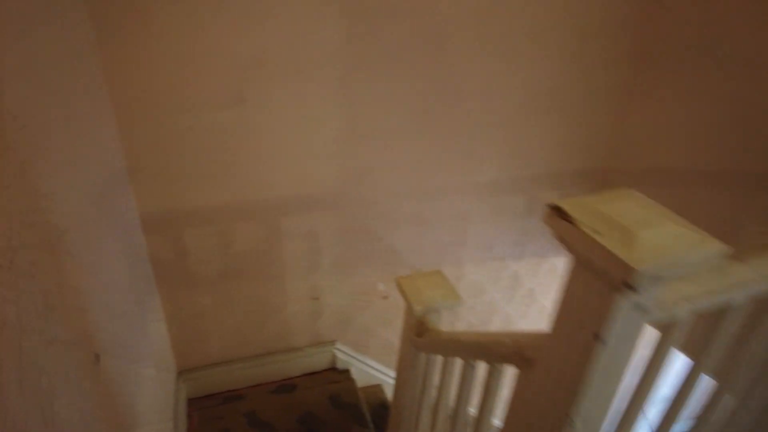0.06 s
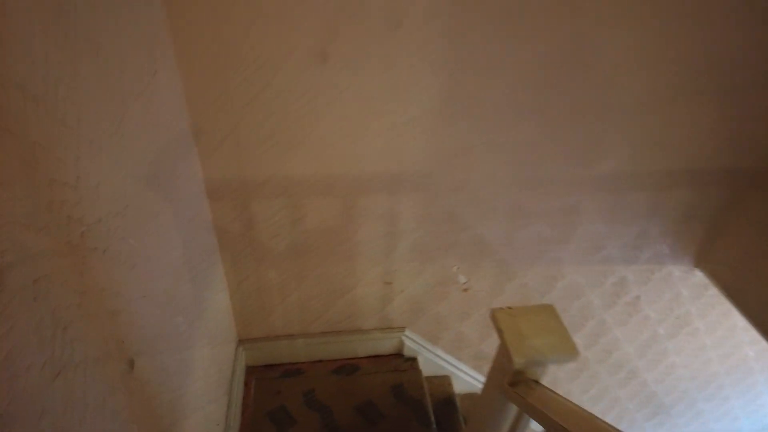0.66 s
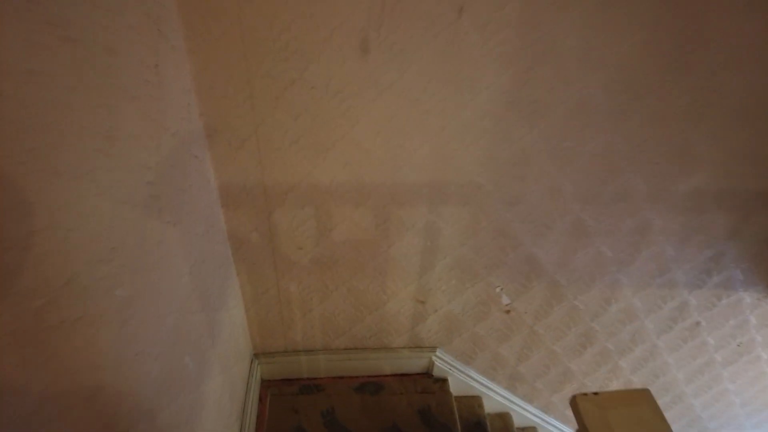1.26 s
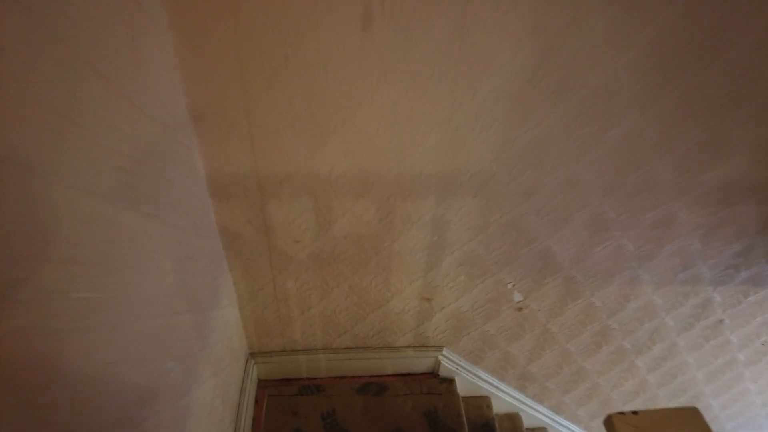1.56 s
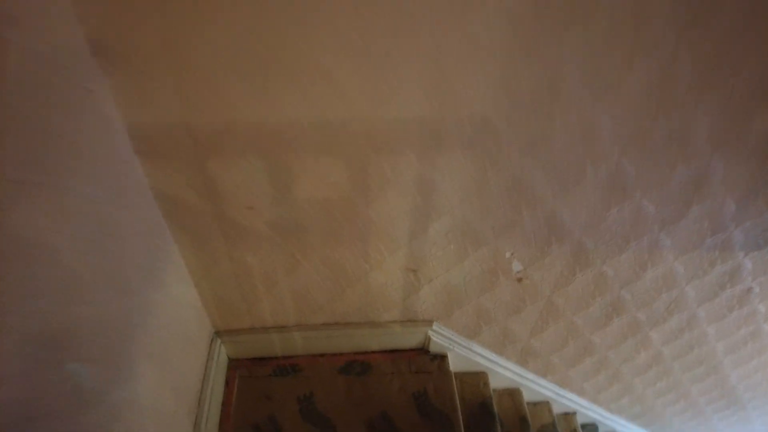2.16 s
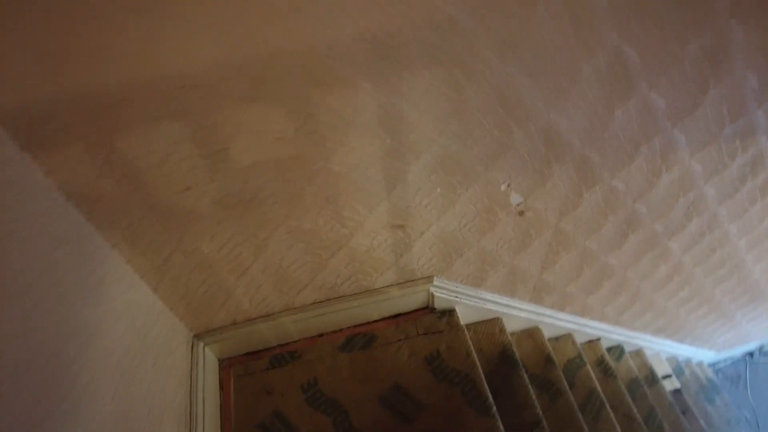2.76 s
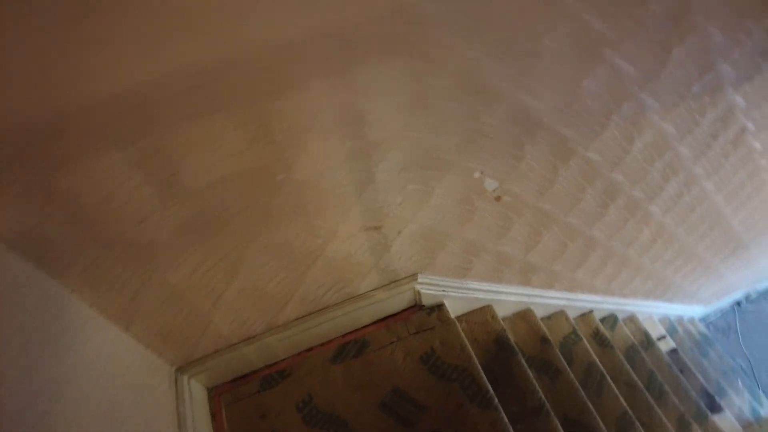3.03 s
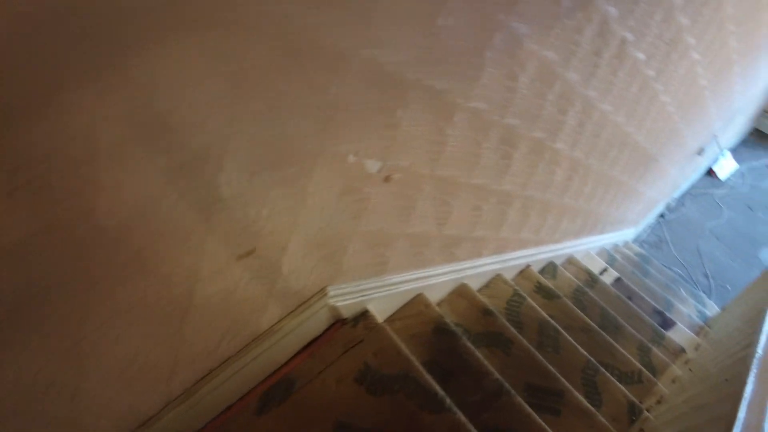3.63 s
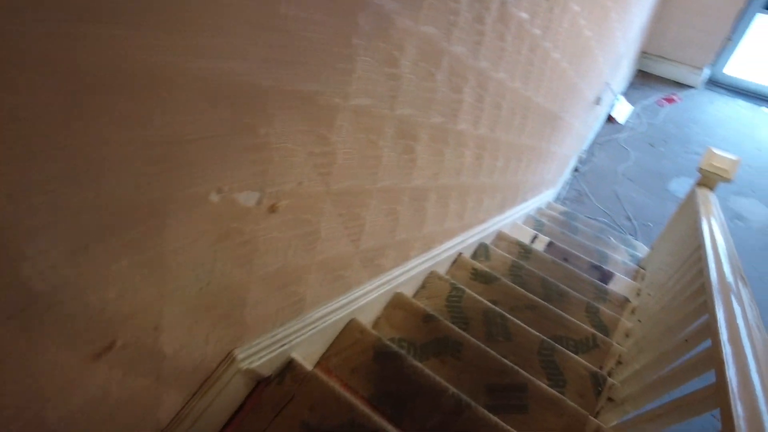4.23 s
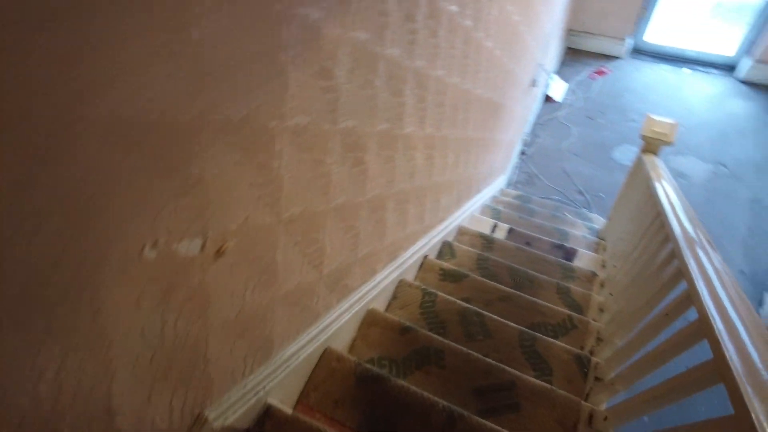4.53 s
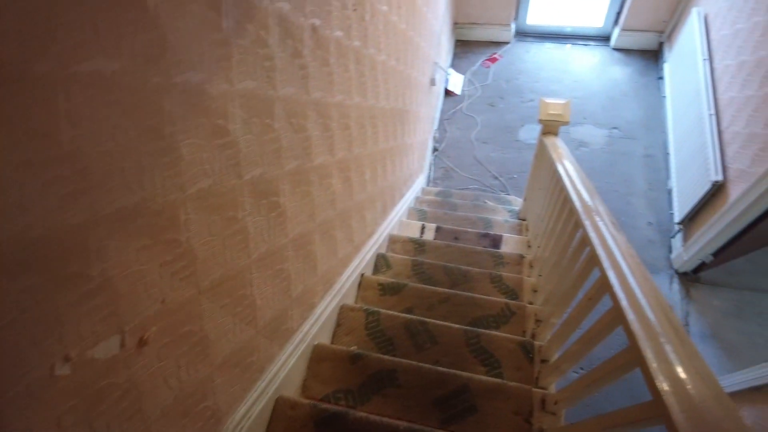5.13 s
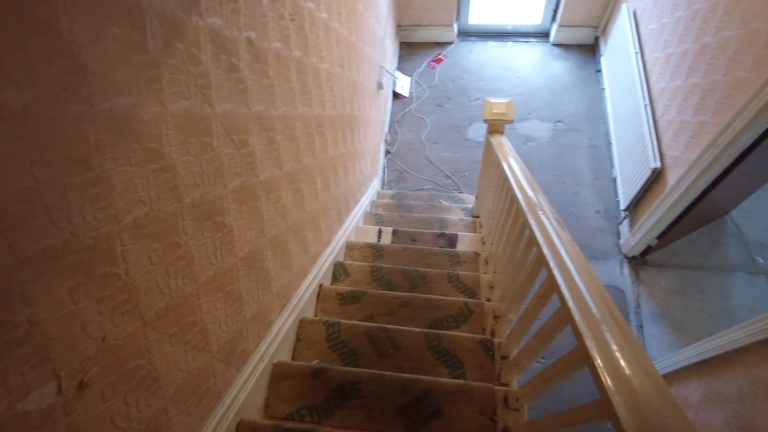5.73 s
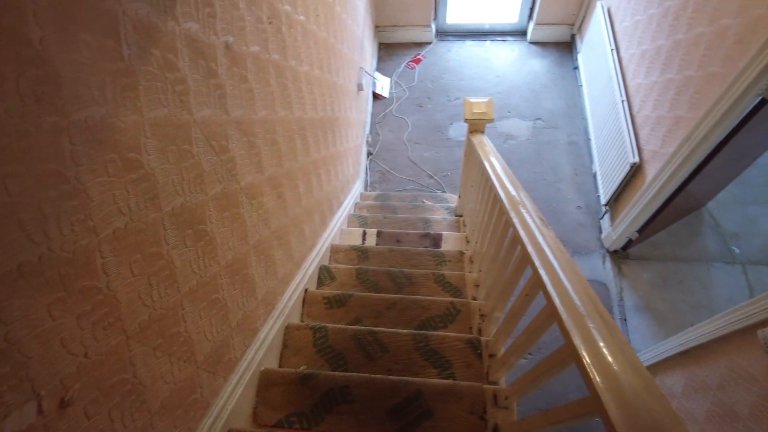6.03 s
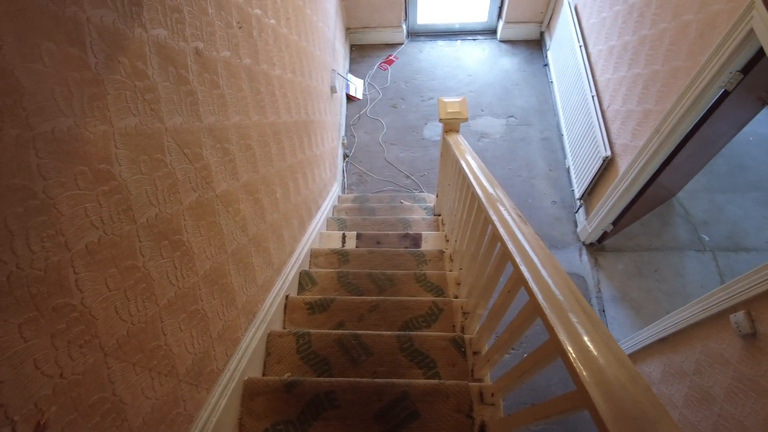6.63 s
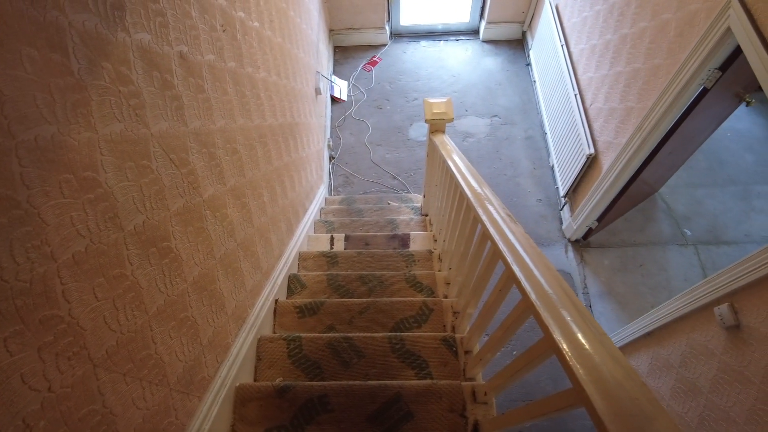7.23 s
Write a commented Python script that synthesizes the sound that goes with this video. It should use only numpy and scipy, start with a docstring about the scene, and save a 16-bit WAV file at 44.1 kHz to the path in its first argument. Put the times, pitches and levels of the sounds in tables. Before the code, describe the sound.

Someone walks slowly across creaky wooden boards with light scuffs and clothing rustle, then stands still in a quiet stairwell.

```python
"""From the first moment someone walks slowly over the bare boards of a landing in an empty house.
Each footfall drives the boards into resonance; loaded boards crack against their nails, soles scuff,
grit crunches, clothes brush and the joists sway. The stairwell reverberates after thud, crack and scuff.
Near 5 s the walker slows, and by 5.6 s stands at the stairhead. The clothes settle, leaving still air,
two very faint scuffs and the low hum that has lain underneath all along."""
import sys
import numpy as np
from scipy import signal
from scipy.fft import rfft, irfft
from scipy.io import wavfile

SR = 44100
rng = np.random.default_rng(int(sys.argv[2]) if len(sys.argv) > 2 else 0)


def store_pcm(level_fs):
    """Save levels as 16-bit WAV."""
    pcm = np.round(np.clip(level_fs, -1, 1) * 32767).astype(np.int16)
    wavfile.write(sys.argv[1], SR, np.atleast_2d(pcm).T)


N = 330176
SPAN = 2 ** 15   # samples in one contact with its echoes
AGE = np.arange(SPAN) / SR
BINS = np.fft.rfftfreq(SPAN, 1 / SR)
SLOW_S, STOP_S, STILL_S = 4.97, 5.6, 6.1   # the walker slows, stops, and the clothes come to rest

# Levels in the tables are relative; each source applies its own gain.
# noise spectrum of the still house: frequency_hz, density_db
AIR_SPECTRUM = [(20,-7.5), (33,-5), (50,-12.5), (80,-15), (110,-18.5), (210,-21.5), (310,-27), (450,-34.5),
                (720,-36), (1000,-42.5), (1290,-35.5), (2000,-43.5), (3800,-44), (5200,-41), (12000,-53),
                (16000,-58)]
# likeness of left and right in a diffuse field: frequency_hz, coherence
COHERENCE = [(60, 1), (130, 0.97), (290, 0.88), (640, 0.039), (1400, 0.54), (3100, 0.2), (7000, 0),
             (15000, 0.02)]
# reverberation time of the stairwell: frequency_hz, t60_s
STAIRWELL_T60 = [(60, 0.98), (200, 0.61), (550, 0.74), (1500, 0.52), (4000, 0.49), (8000, 0.4),
                 (14000, 0.26)]
# colour of the stairwell's reverberation: frequency_hz, level_db
STAIRWELL_SPECTRUM = [(60, -1), (200, -2.5), (550, 3.5), (1500, 2.5), (4000, -1.5), (14000, -2.5)]
# friction noise of clothes: frequency_hz, density_db
CLOTH_SPECTRUM = [(500, 14), (1500, 11.5), (3000, 7), (6000, -1.5), (10000, -5), (15500, -5)]
# the walker's weight shifts: start_s, level_db
WEIGHT_SHIFTS = [(0.85, -43.5), (1.76, -55), (1.96, -50), (2.58, -44.5), (2.8, -41), (3.3, -46),
                 (3.57, -47), (3.95, -42), (4.52, -47), (4.958, -38.5), (5.45, -50.5)]
# noise of crushed grains: frequency_hz, density_db
GRIT_SPECTRUM = [(500, -4.5), (1500, 4.5), (3000, -5), (7000, 6), (11000, -1.5), (15500, -1.5)]
# a sole rubs the floor: start_s, level_db, treble_tilt_db, squeak_hz, decay_s
SCUFFS = [(0.135, -45, -3, 1730, 0.016), (0.727, -66, -6.5, 1530, 0.0061), (0.794, -62.5, 13, 1560, 0.012),
          (0.879, -47, 0.5, 1480, 0.022), (0.923, -41.5, 0, 1620, 0.019), (1.035, -50, 8, 1500, 0.026),
          (1.7645, -45.5, -2, 1690, 0.02), (1.955, -54.5, -4.5, 1520, 0.011),
          (2.188, -57.5, 1, 1690, 0.011), (2.44, -60, 0, 1640, 0.01), (2.96, -48.5, -4.5, 1767, 0.012),
          (3.146, -56, 5.5, 1440, 0.0068), (3.3846, -48.5, -2, 1590, 0.0078),
          (3.4635, -51.5, -2, 1570, 0.0065), (3.67, -53, 2, 1420, 0.028), (3.704, -49, -3, 1590, 0.045),
          (3.752, -63, -4, 1560, 0.0054), (3.8906, -62.5, 2, 1650, 0.0045), (4.106, -58, 4, 3000, 0.012),
          (4.308, -48.5, 1.5, 2650, 0.009), (4.638, -63, 3, 1840, 0.0056), (4.891, -51, 4, 2940, 0.009),
          (4.946, -52.5, 3.5, 1790, 0.033), (5.108, -48, 2.5, 1900, 0.021),
          (5.436, -49.5, -0.5, 3010, 0.026), (5.521, -57, -5.5, 2380, 0.0069),
          (5.623, -63.5, 6, 2030, 0.0056), (6.88, -79, -10.5, 1000, 0.043), (7.12, -82, -7.5, 1400, 0.012)]
# normal modes of the floorboards: frequency_hz, bandwidth_hz, gain_db
BOARD_MODES = [(78, 3.8, -1.5), (120, 10, -7), (151.6, 2.3, -1), (186, 3.1, -3), (295, 20, -11),
               (448.8, 36, -5), (704, 5.7, -7), (1010, 7.9, 2), (1274, 48, 5.5), (1620, 70, -9.5),
               (2060, 2.9, -12), (3100, 34, -6.5)]
# a board slips on its nails: start_s, level_db, brightness_db, note_hz, note_db, squeak_hz, decay_s
CRACKS = [(0.217, -39.5, -6.5, 606, 4, 1430, 0.036), (1.326, -47.5, -2.5, 433, 14, 1217, 0.018),
          (1.428, -39, 8, 447, 8, 1316, 0.029), (1.530, -38, 9.5, 419, 4, 1425, 0.026),
          (2.719, -40, -9.5, 419, 4, 1330, 0.0065), (2.773, -35.5, -12, 704, 4, 1105, 0.016),
          (3.325, -44.5, -3, 402, 7.5, 1377, 0.031), (3.505, -41, 5.5, 407, 5.5, 1390, 0.026),
          (4.151, -49.5, 9, 534, 9.5, 1995, 0.011), (4.518, -47, 0.5, 504, 6, 1710, 0.023),
          (4.807, -62, 15, 497, 25.5, 1154, 0.0087)]
# hollow tone of a slipping board: frequency_hz, gain_db
SLIP_TONE = [(30, -3), (90, 8.5), (250, 3), (480, -1.5), (600, -0.5), (1000, -5.5), (1350, 2.5), (1900, 2),
             (2900, 2), (3500, 4.5), (4300, 0), (6000, -1), (8000, -3.5), (16000, -10.5)]
# partials of a nail's squeak: pitch_ratio, bandwidth_hz, gain_db
NAIL_PARTIALS = [(1, 58.6, -15), (1.28, 43.9, 6), (1.63, 38.9, -2.5), (2.2, 60, 0.5)]
# a shoe strikes a board: start_s, level_db, boom_db, hardness_db, note_hz, decay_s
FOOTFALLS = [(0.015, -20.5, -29.5, 5, 181, 0.025), (0.452, -35, -16.5, 3.5, 160.6, 0.041),
             (0.769, -34.5, -25, 2, 151, 0.051), (0.802, -14, -29.5, -2.5, 154, 0.011),
             (1.085, -45.5, -4.5, 10, 159, 0.05), (1.764, -32.5, -7, 10, 326, 0.029),
             (1.777, -35, 5.5, -3.5, 192, 0.016), (1.825, -36, -4.5, -21, 83, 0.042),
             (1.958, -40.5, -3.5, 8, 129, 0.04), (2.228, -51, -2.5, 0, 300, 0.018),
             (2.627, -48, 4, 9, 293, 0.027), (2.681, -40, -1, 0.5, 118, 0.03),
             (2.733, -29.5, -3.5, -1, 165, 0.0023), (2.905, -45, 4.5, -8, 101, 0.02),
             (3.510, -41, 14, 12, 77, 0.018), (3.574, -39.5, -1, 5.5, 127, 0.021),
             (3.675, -21.5, -3, -12.5, 223, 0.013), (3.977, -46, -6.5, -2, 120, 0.014),
             (4.269, -55.5, 8, 16, 145, 0.04), (4.319, -49.5, 3, -3, 167, 0.046),
             (4.365, -35.5, -12, 1.5, 337, 0.018), (4.427, -47, -11, 15, 477, 0.02),
             (4.482, -50, 18, -21, 93, 0.0056), (4.503, -46.5, 15.5, -11, 84.4, 0.011),
             (4.530, -47.5, 17, -3, 87, 0.0089), (4.973, -31.5, -8, 0, 380, 0.024),
             (5.522, -39.5, -7.5, 4, 345, 0.028)]
# tone of a board under the shoe: frequency_hz, gain_db
WOOD_TONE = [(30, -19), (55, 1), (85, 2.5), (170, -2), (290, 1), (450, -3.5), (550, -2.5), (680, 1.5),
             (850, -2), (1150, -4.5), (1600, -6.5), (2200, -13), (4500, -3.5), (16000, -10)]
# response ripple of the microphone ports: frequency_hz, gain_db
PORT_RIPPLE = [(2000, 0), (2800, 1), (3600, -3), (4300, 2.5), (5000, -1.5), (6100, 2.5), (7000, -0.5),
               (7800, 2.5), (9500, 1.5), (12000, 1.5)]
# imbalance of the two ports: frequency_hz, left_minus_right_db
PORT_BALANCE = [(60, 1.4), (250, 2.5), (500, 1), (1000, 4), (2000, -0.2), (8000, 0.4), (12000, 0.5)]


def from_db(db):
    """Amplitude ratio of a level in decibels."""
    return 10 ** (np.asarray(db) / 20)


def unit_rms(x):
    """Normalisation to unit mean power."""
    return x / np.sqrt(np.mean(x ** 2) + 1e-20)


def at_hz(points, hz):
    """Interpolation of a table on a log-frequency axis."""
    frequency_hz, value = np.transpose(points)
    return np.interp(np.log(np.maximum(hz, 1)), np.log(frequency_hz), value)


def add(out, start_s, sound):
    """Superposition: a sound joins the mix at its start time."""
    start = max(round(start_s * SR), 0)
    out[:, start:start + sound.shape[1]] += sound[:, :N - start]


def resonate(x, hz, width_hz):
    """Damped resonance: two poles, gain 1 at the peak."""
    radius = np.exp(-np.pi * width_hz / SR)
    feedback = [1, -2 * radius * np.cos(2 * np.pi * hz / SR), radius ** 2]
    return signal.lfilter(np.array([1, 0, -1]) * (1 - radius ** 2) / 2, feedback, x + 1e-18)


def wander(rate_hz):
    """Random modulation: straight lines between Gaussian values of spread 1."""
    knots = rng.standard_normal(2000)
    return np.interp(np.arange(N) / SR * rate_hz, np.arange(len(knots)), knots)


def whiten(spectrum, share=0.83, least_hz=30):
    """Whitening: division by the local mean magnitude removes broad colour and keeps fine peaks."""
    energy = np.cumsum(np.mean(np.abs(spectrum) ** 2, axis=0)) * BINS[1]
    low, high = np.clip(BINS + (share * BINS + least_hz) * [[-1], [1]], 0, SR / 2)
    power = (np.interp(high, BINS, energy) - np.interp(low, BINS, energy)) / (high - low)
    return spectrum / np.sqrt(np.abs(power) + 1e-20)


def pulse(colour_db):
    """Minimum phase: the spectrum of the most compact causal pulse of a given colour."""
    cepstrum = irfft(np.log(from_db(colour_db)))
    causal_fold = (1 + np.sign(SPAN / 2 - np.arange(SPAN))) * np.where(AGE > 0, 1, .5)
    return np.exp(rfft(cepstrum * causal_fold))


def diffuse(size):
    """Diffuse field: a white stereo noise spectrum, coherent in the bass and incoherent in the treble."""
    mid, side = rfft(rng.standard_normal((2, size)))
    coherence = np.clip(at_hz(COHERENCE, np.fft.rfftfreq(size, 1 / SR)), 0, 1)
    return np.sqrt((1 + coherence) / 2) * mid + np.sqrt((1 - coherence) / 2) * side * [[1], [-1]]


def steady_noise(spectrum):
    """Stationary noise: a diffuse field of a given colour, rms 1."""
    colour = from_db(at_hz(spectrum, np.fft.rfftfreq(N, 1 / SR)))
    return unit_rms(irfft(diffuse(N) * colour, N))


def still_air(gain_db=-66.5):
    """Ambient noise: the diffuse field of the empty house, strongest in the bass."""
    return from_db(gain_db) * steady_noise(AIR_SPECTRUM)


def hum(pitch_hz=168.4, waver_hz=7.6, swell_db=3, gain_db=-70.5):
    """Frequency and amplitude modulation make a faint low tone waver at random."""
    frequency_hz = pitch_hz + waver_hz * wander(rate_hz=42)
    tone = np.sin(2 * np.pi * np.cumsum(frequency_hz) / SR)
    return from_db(gain_db) * unit_rms(tone * from_db(swell_db * wander(rate_hz=14)))


def stairwell(build_s=0.0057):
    """Reverberation from one spot, as a spectrum: echoes build, then each octave decays exponentially."""
    noise, tail = diffuse(SPAN), 0
    octave = np.log2(np.clip(BINS, 60, 15360) / 60)
    for k in range(int(octave[-1]) + 1):
        band = irfft(noise * np.maximum(1 - np.abs(octave - k), 0))
        tail = tail + band * np.exp(-np.log(1000) * AGE / at_hz(STAIRWELL_T60, 60 * 2 ** k))
    build_up = 1 - np.exp(-AGE / build_s)
    return whiten(rfft(tail * build_up)) * from_db(at_hz(STAIRWELL_SPECTRUM, BINS))


def weight_envelope(rise_s, fall_db_per_s):
    """Incoherent addition: each shift of weight rises and dies away, and their powers add."""
    start_s, level_db = np.transpose(WEIGHT_SHIFTS)[:, :, None]
    t = np.arange(0, N, 64) / SR
    age = np.maximum(t - start_s, 0)
    shifts = np.minimum(age / rise_s, 1) * from_db(level_db - fall_db_per_s * np.maximum(age - rise_s, 0))
    return np.interp(np.arange(N) / SR, t, np.linalg.norm(shifts, axis=0))


def clothes(walking_db=-67, settling_db=-76, brush_db=-29, flutter_db=-1.5):
    """Friction noise: cloth rustles through the walk and brushes harder at each shift of weight."""
    rustle_db = np.interp(np.arange(N) / SR, [SLOW_S, STOP_S, STILL_S],
                          [walking_db, settling_db, settling_db], right=-120)
    brushes = from_db(brush_db) * weight_envelope(rise_s=0.08, fall_db_per_s=60)
    flutter = from_db(flutter_db * wander(rate_hz=250))
    return np.hypot(from_db(rustle_db), brushes) * flutter * steady_noise(CLOTH_SPECTRUM)


def joists(mode_hz=29.8, wander_rad=0.4, left_db=-1, right_db=4):
    """Fundamental mode: the whole floor swings at its lowest frequency as the weight shifts."""
    swing = np.sin(2 * np.pi * mode_hz * np.arange(N) / SR + wander_rad * wander(rate_hz=4))
    envelope = weight_envelope(rise_s=0.045, fall_db_per_s=34)
    return envelope * unit_rms(swing) * from_db([[left_db], [right_db]])


def grit(grains_per_s=8.1, spread_db=5.5, decay_s=0.02, gain_db=-80.5):
    """Poisson process: stray grains crunch underfoot at random moments until the walker stops."""
    crushed = (rng.random(N) < grains_per_s / SR) & (np.arange(N) < STOP_S * SR)
    grains = crushed * from_db(spread_db * rng.standard_normal(N))
    envelope = signal.lfilter([1], [1, -np.exp(-1 / (decay_s * SR))], grains + 1e-18)
    return from_db(gain_db) * envelope * steady_noise(GRIT_SPECTRUM)


def contact(colour_db, decay_s, impulse_db, grain_db, echoes, bite_s=0.0013):
    """Source and filter: an impulse, a dying uneven clatter and their echoes take on one colour."""
    grains = from_db(grain_db * np.repeat(rng.standard_normal(SPAN // 32), 32))
    envelope = np.exp(-AGE / max(decay_s, .002)) * (1 - np.exp(-AGE / bite_s))
    clatter = whiten(rfft(irfft(diffuse(SPAN)) * grains * envelope))
    direct = whiten(clatter + from_db(impulse_db))
    fade_out = np.clip((.65 - AGE) / .15, 0, 1)
    excitation = irfft(direct + echoes) * fade_out
    arrival_delay = np.exp(-2j * np.pi * BINS / SR * np.array([[0], [3]]))   # right lags by 3 samples
    return irfft(rfft(excitation) * pulse(colour_db) * arrival_delay)


def scuffs(spots, gain_db=-9, echo_db=-3, rise_share=0.57, squeak_db=7):
    """Sliding friction: soles rub with a trace of squeak, too lightly to move the floor."""
    out = np.zeros((2, N))
    for k, (start_s, level_db, tilt_db, squeak_hz, decay_s) in enumerate(SCUFFS):
        colour = [(200, 33 - tilt_db), (900, 40 - tilt_db), (1800, 45 - tilt_db), (2900, 43 - tilt_db),
                  (5000, 38.3), (11000, 29 + tilt_db), (16000, 28 + tilt_db)]
        echoes = from_db(echo_db) * spots[k % len(spots)]
        rub = contact(level_db + at_hz(colour, BINS), decay_s, impulse_db=-15, grain_db=4.5, echoes=echoes)
        rub *= 1 - np.exp(-AGE / (rise_share * decay_s))   # longer rubs swell more slowly
        add(out, start_s, rub + from_db(squeak_db) * resonate(rub, squeak_hz, width_hz=55))
    return from_db(gain_db) * out


def boards(drive):
    """Modal response: the floorboards ring on at their natural frequencies."""
    return drive + sum(from_db(db) * resonate(drive, hz, width_hz) for hz, width_hz, db in BOARD_MODES)


def cracks(spots, gain_db=-3.5, echo_db=-2, full_crack_db=-39):
    """Stick-slip: a loaded board lets go in a burst of slips that ring its note and squeak at the nail."""
    out = np.zeros((2, N))
    for k, (start_s, level_db, bright_db, note_hz, note_db, squeak_hz, decay_s) in enumerate(CRACKS):
        force_db = level_db - full_crack_db
        body_db = 0.66 * force_db   # weak cracks hardly move the board
        knock_db = 0.35 * force_db - 0.14 * bright_db   # bright ones knock less
        squeak_db = -0.14 * force_db   # gentle slips squeak more than violent ones
        colour = [(60, body_db + 44), (240, body_db + 56), (650, knock_db + 51), (1700, 37.86),
                  (4800, bright_db + 26), (9000, bright_db + 19), (15000, bright_db + 14)]
        colour_db = level_db + at_hz(colour, BINS) + at_hz(SLIP_TONE, BINS)
        echoes = from_db(echo_db) * spots[-1 - k % len(spots)]
        slips = contact(colour_db, decay_s, impulse_db=-14, grain_db=5, echoes=echoes)
        note = from_db(note_db) * resonate(slips, note_hz, width_hz=30)
        squeak = sum(from_db(db) * resonate(slips, ratio * squeak_hz, width_hz)
                     for ratio, width_hz, db in NAIL_PARTIALS)
        add(out, start_s, slips + note + from_db(squeak_db) * squeak)
    return from_db(gain_db) * out


def footfalls(spots, gain_db=-4, echo_db=-5, pump_db_per_s=382.5):
    """Impact: a soft, heavy blow has a long contact and little treble, and excites the board's own note."""
    out = np.zeros((2, N))
    for k, (start_s, level_db, boom_db, hardness_db, note_hz, decay_s) in enumerate(FOOTFALLS):
        treble_db = 0.87 * hardness_db
        colour = [(35, boom_db + 38), (90, boom_db + 56), (210, 52.06), (600, hardness_db + 35),
                  (1400, treble_db + 20), (2300, treble_db + 11), (4000, treble_db - 1),
                  (14000, treble_db - 14)]
        colour_db = level_db + at_hz(colour, BINS) + at_hz(WOOD_TONE, BINS)
        # a slack, booming board sends less up the stairwell
        echoes = from_db(echo_db - 0.25 * boom_db) * spots[k % len(spots)]
        blow = contact(colour_db, decay_s, impulse_db=-2, grain_db=3, echoes=echoes)
        note_db = -4 + pump_db_per_s * decay_s   # a longer clatter pumps up the note
        add(out, start_s, blow + from_db(note_db) * resonate(blow, note_hz, width_hz=32))
    return from_db(gain_db) * out


def scene(spot_count=12, pan_db=0.62):
    """Superposition of all sources; each spot on the landing has echoes of its own."""
    spots = [stairwell() for _ in range(spot_count)]
    floor = boards(footfalls(spots) + cracks(spots)) * from_db([[-pan_db], [pan_db]])
    return floor + scuffs(spots) + grit() + joists() + clothes() + hum() + still_air()


def record(dry, cutoff_hz=15780):
    """Linear filtering: two microphone ports colour the sound, and a steep low-pass cuts the top."""
    hz = np.fft.rfftfreq(N, 1 / SR)
    response_db = at_hz(PORT_RIPPLE, hz) + at_hz(PORT_BALANCE, hz) * [[.5], [-.5]]
    coloured = irfft(rfft(dry) * from_db(response_db), N)
    return signal.sosfilt(signal.ellip(12, .1, 70, cutoff_hz, fs=SR, output="sos"), coloured)


dry = scene()
out = record(dry)
store_pcm(out)
```